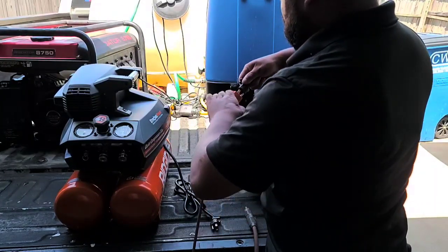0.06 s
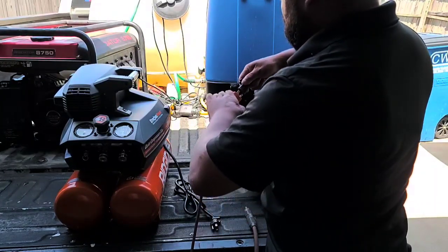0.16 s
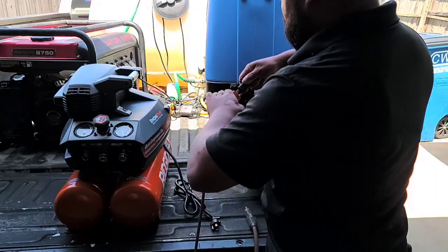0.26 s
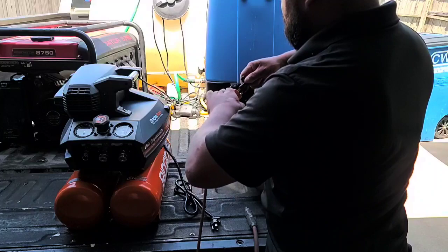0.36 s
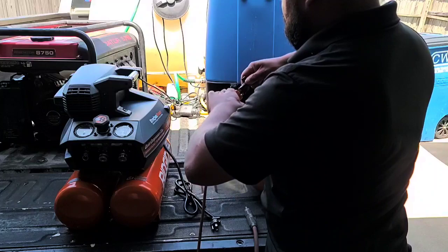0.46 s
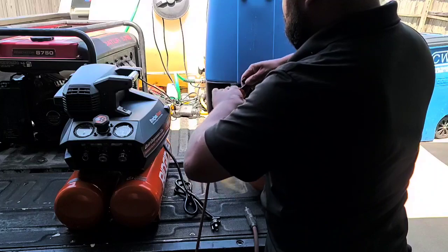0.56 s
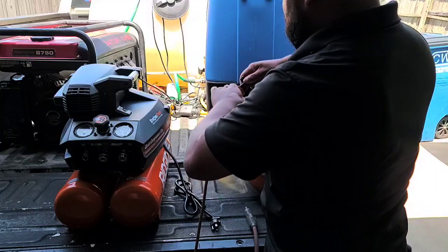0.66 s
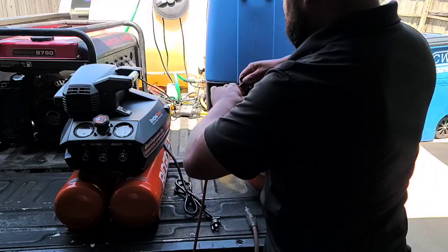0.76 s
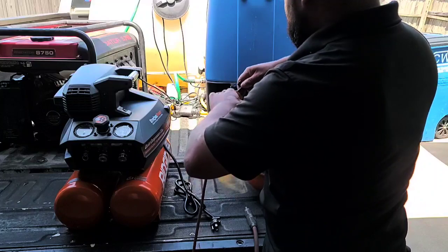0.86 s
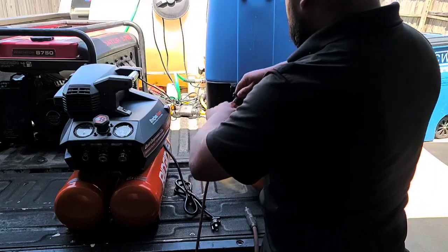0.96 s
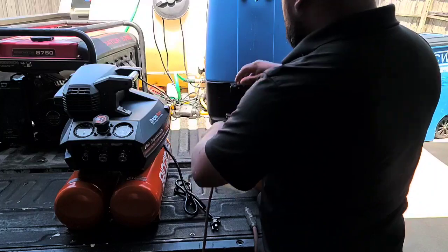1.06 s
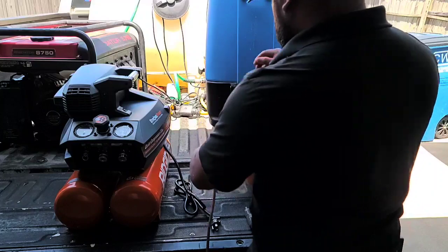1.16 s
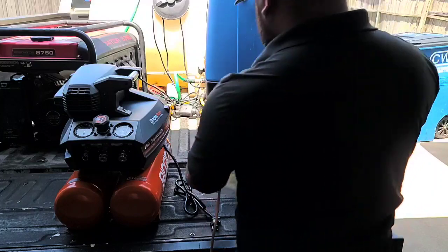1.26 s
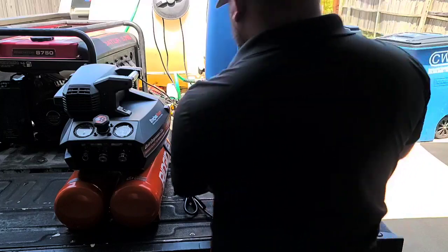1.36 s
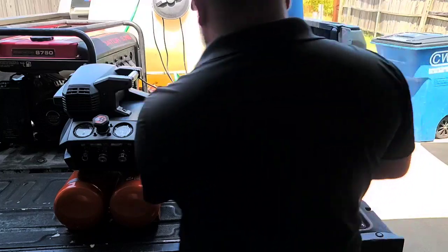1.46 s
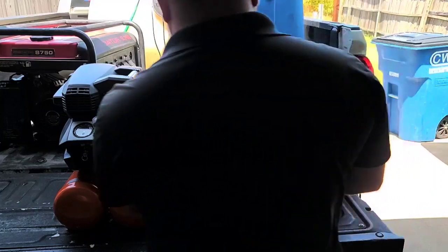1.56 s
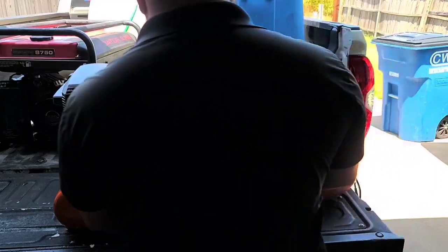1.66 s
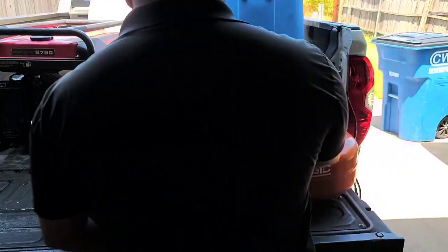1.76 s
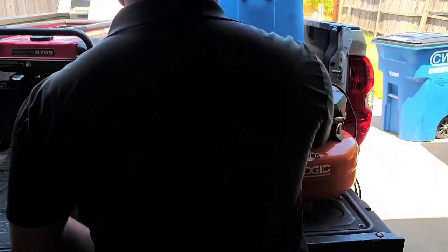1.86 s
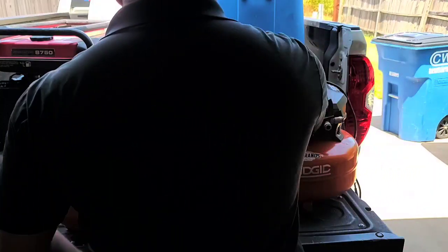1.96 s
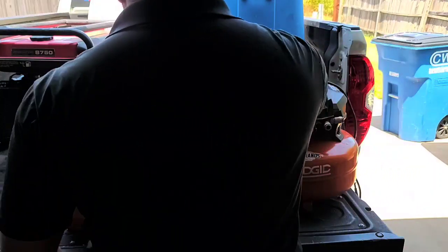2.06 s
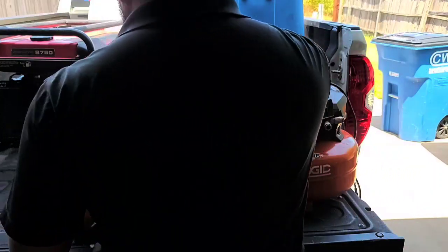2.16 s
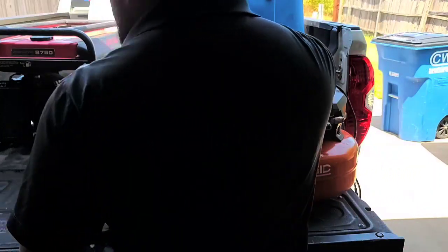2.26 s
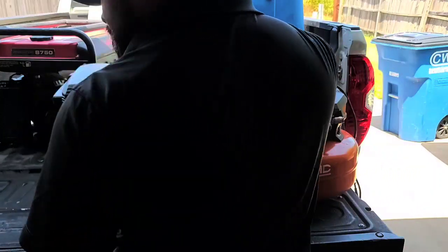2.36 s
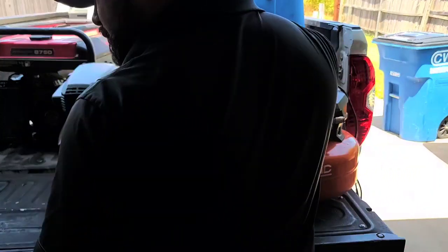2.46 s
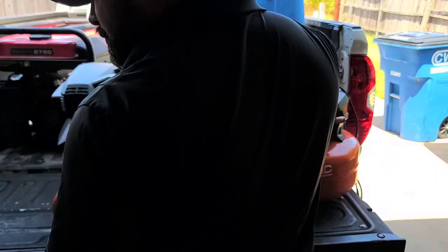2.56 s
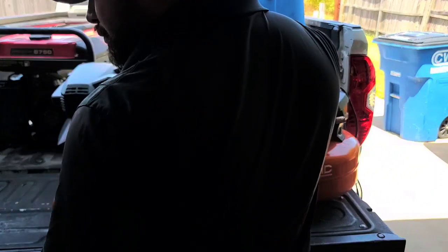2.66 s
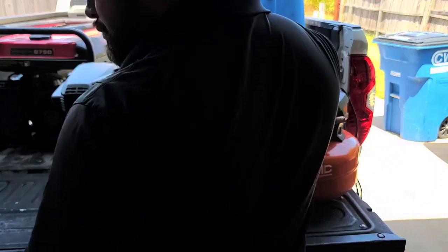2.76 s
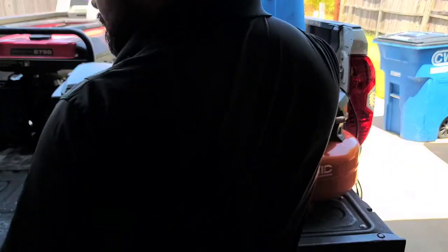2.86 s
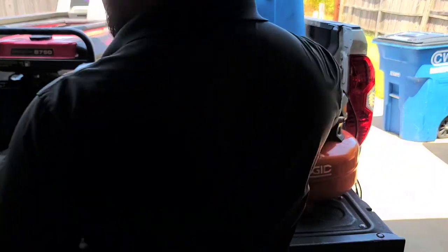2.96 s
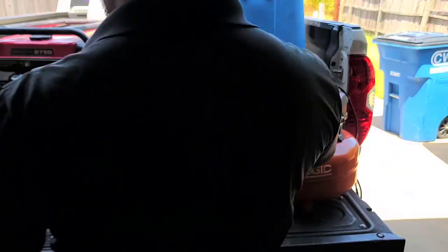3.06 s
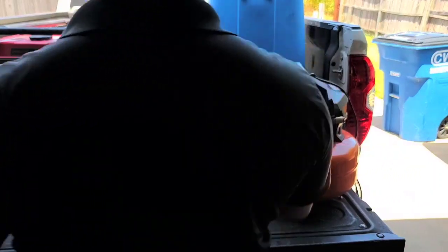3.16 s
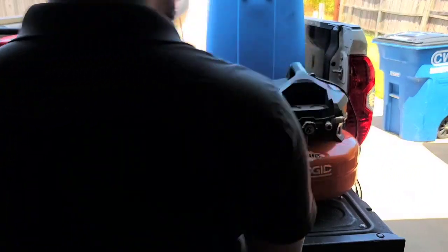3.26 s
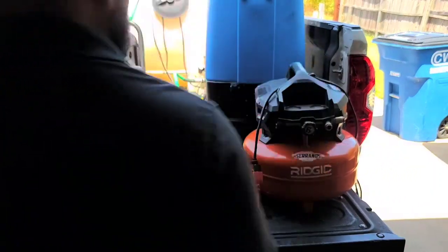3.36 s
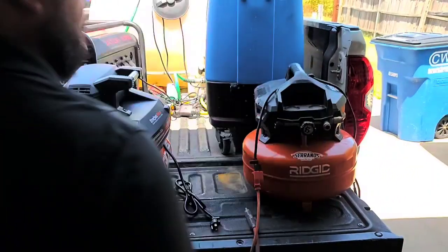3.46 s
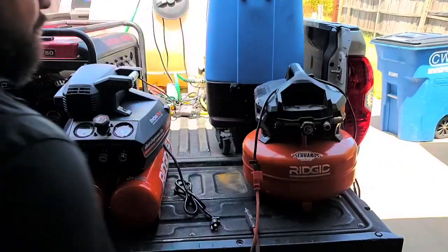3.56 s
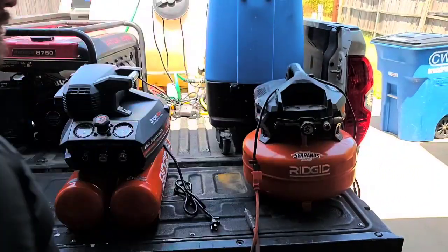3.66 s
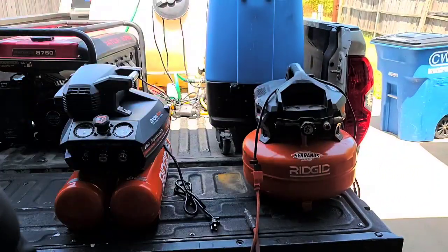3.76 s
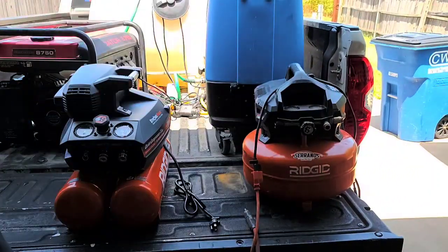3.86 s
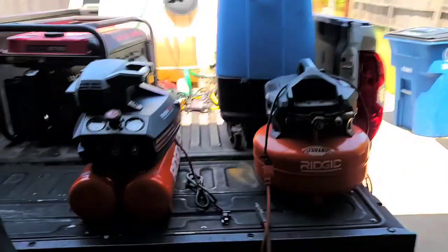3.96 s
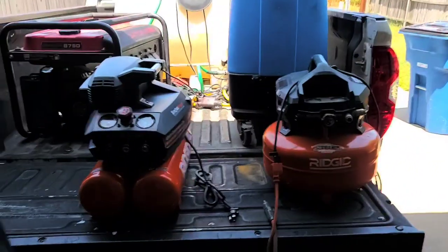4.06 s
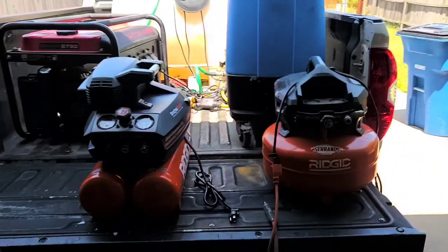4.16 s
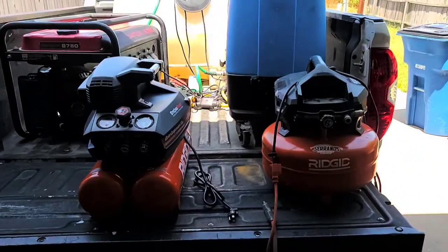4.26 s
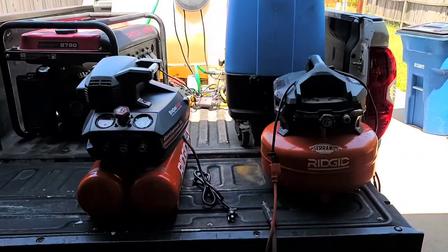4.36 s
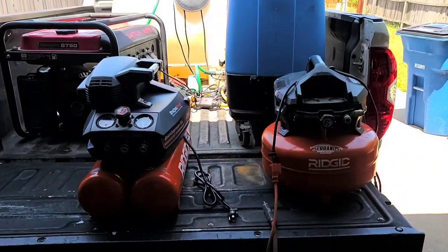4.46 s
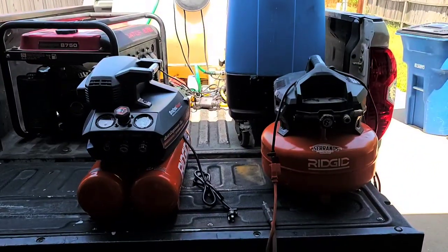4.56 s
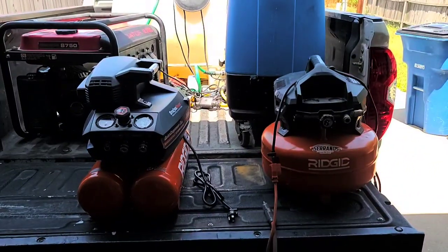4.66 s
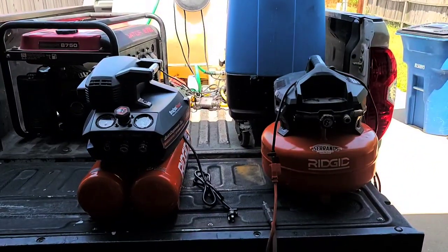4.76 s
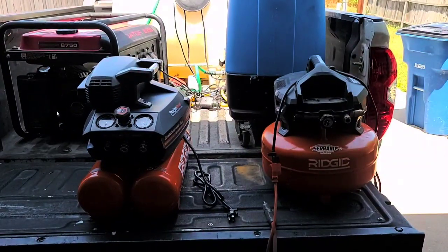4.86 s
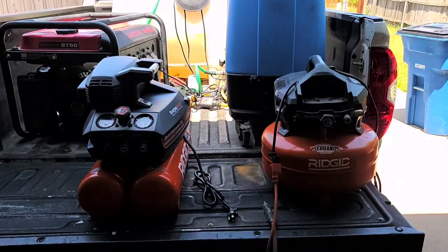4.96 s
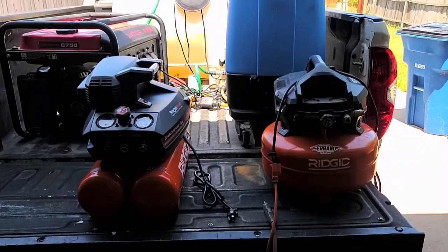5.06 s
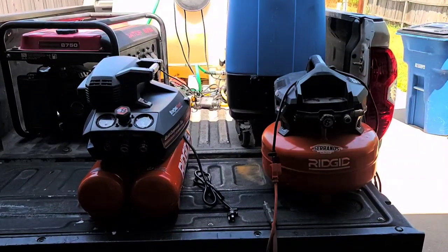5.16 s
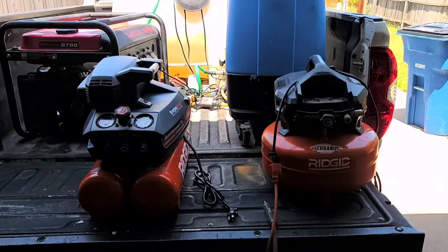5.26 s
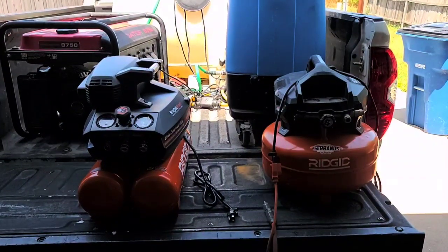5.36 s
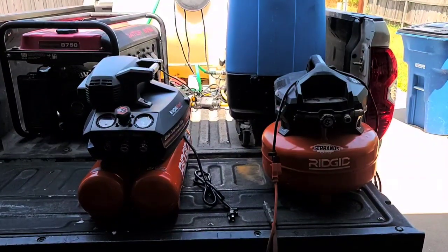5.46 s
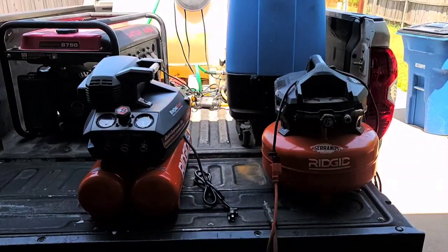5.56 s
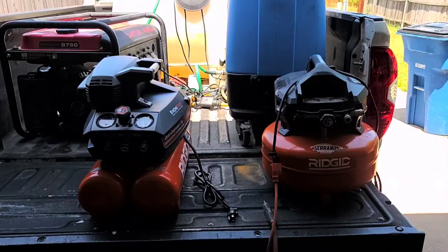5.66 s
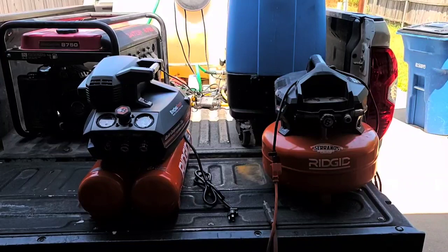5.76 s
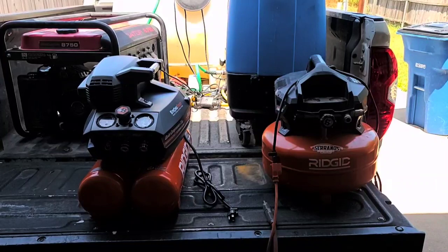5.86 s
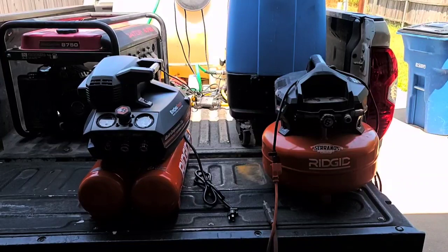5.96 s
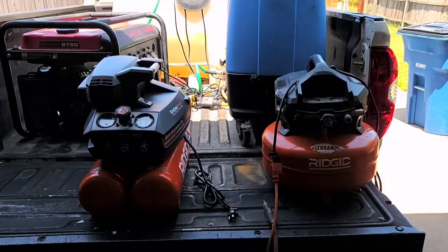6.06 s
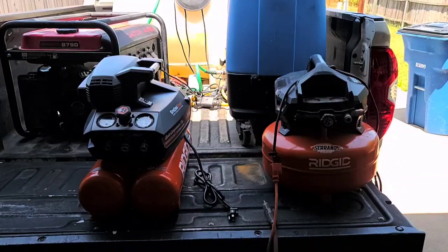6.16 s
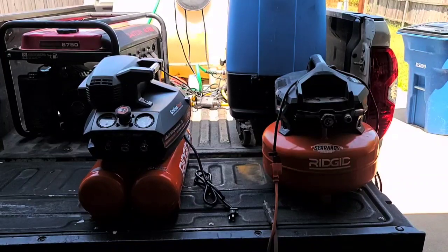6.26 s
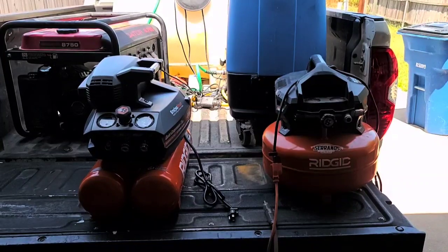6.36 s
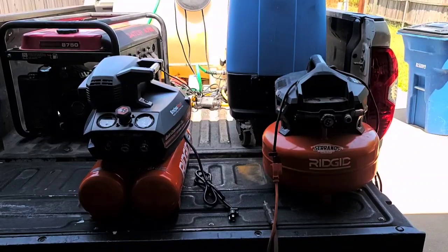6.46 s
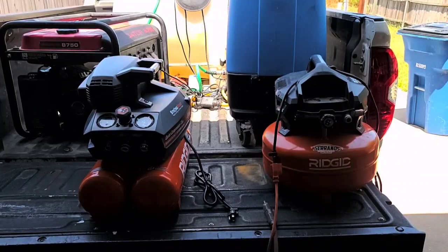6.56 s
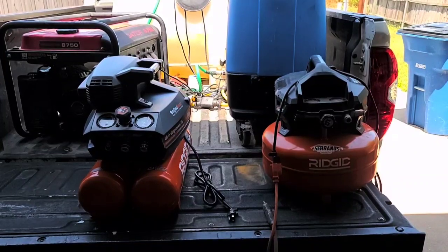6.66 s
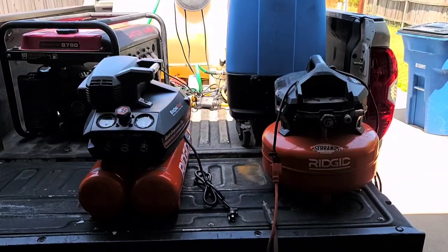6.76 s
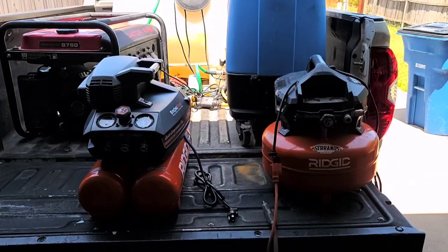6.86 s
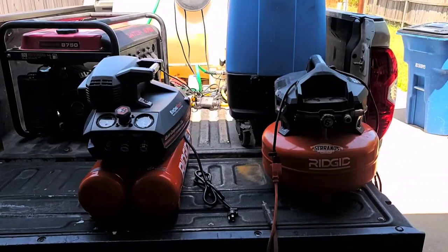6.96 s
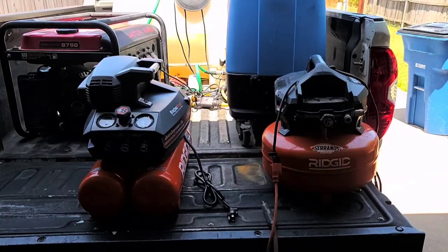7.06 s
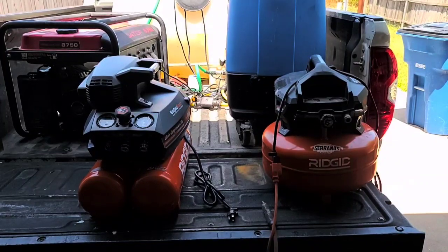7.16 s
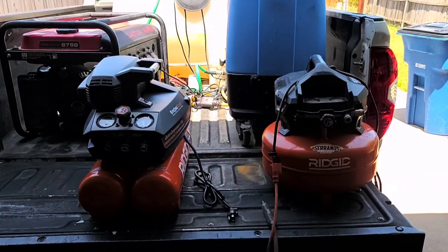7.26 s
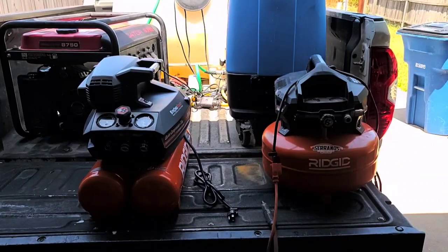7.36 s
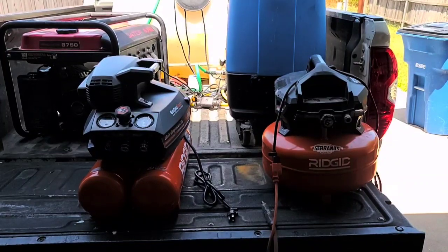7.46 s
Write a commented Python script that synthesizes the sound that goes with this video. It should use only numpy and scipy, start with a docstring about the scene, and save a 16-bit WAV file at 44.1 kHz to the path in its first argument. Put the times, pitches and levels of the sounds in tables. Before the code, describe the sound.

A hose coupler clicks, the hose drags and thuds onto a ribbed tailgate, then a piston compressor jolts into a loud, steady, clattering drone.

```python
"""A piston air compressor on a pickup's tailgate, outdoors, driven by a brush motor through a 4.5:1 reduction.
The motor growls at stall, spins up and runs loud, sagging slightly as the tank fills and its operator steps aside.
Piston and rotor are harmonics locked to the crank; air, gears and reeds are noise and pulses timed by its turns.
Before the start a hose coupler clicks and the hose is dragged and dropped on the bed: forces ring decaying modes.
Filtered noise makes the outdoor background, the shuffling and the scuffs."""
import sys
import numpy as np
from scipy import signal
from scipy.fft import rfft, irfft
from scipy.io import wavfile

SR = 44100
rng = np.random.default_rng(int(sys.argv[2]) if len(sys.argv) > 2 else 0)


def int16_out(signal):
    """Quantize to a 16-bit WAV file."""
    q = np.round(np.clip(np.atleast_2d(signal).T, -1, 1) * 32767)
    wavfile.write(sys.argv[1], SR, q.astype(np.int16))


N = 330750
TIME = np.arange(N) / SR
FREQS = np.maximum(np.arange(N // 2 + 1) * SR / N, 1)
SWITCH_S = 2.7585
GEAR = 4.5  # rotor turns per crank turn
RUN_RATE = 58.58  # crank turns per second, typical of the steady run


def from_db(db):
    """Decibel law: level to amplitude gain."""
    return 10 ** (np.asarray(db) / 20)


def rms_one(x):
    """Power normalisation: scale to unit rms."""
    return x / np.sqrt(np.mean(x ** 2) + 1e-20)


def in_time(rows):
    """Linear interpolation: each column of a curve, sample by sample."""
    s, *columns = np.transpose(rows)
    return [np.interp(TIME, s, column) for column in columns]


def colour(points, bumps=()):
    """Spectral envelope: a slope over log frequency, in dB, with resonances added on top."""
    hz, db = np.transpose(points)
    slope = np.interp(np.log(FREQS), np.log(hz), db)
    resonances = sum(height / (1 + (2 * (FREQS - f) / width) ** 2) for f, width, height in bumps)
    return from_db(slope + resonances)


def drift(rate_hz):
    """Random modulation: noise through a double pole at rate_hz, drawn every 100 samples, unit rms."""
    r = np.exp(-200 * np.pi * rate_hz / SR)
    noise = rng.standard_normal(N // 100 + 1002)
    slow = signal.lfilter([1], [1, -2 * r, r * r], noise)[1000:]  # drop the filter's onset
    return np.interp(np.arange(N) / 100, np.arange(len(slow)), rms_one(slow))


def split(x, gain, splits_hz):
    """Band analysis: colour a steady sound and part it into adjoining bands, each of unit rms."""
    rest, bands = rfft(x) * gain, []
    for hz in splits_hz:
        below = 1 / (1 + (FREQS / hz) ** 10)
        bands.append(rest * below)
        rest = rest * (1 - below)
    return [rms_one(irfft(band, N)) for band in bands + [rest]]


def ring(force, modes):
    """Modal superposition: a force drives decaying resonances in parallel, with alternating signs."""
    out = 0
    for k, (hz, t60, db) in enumerate(modes):
        r = np.exp(-np.log(1000) / (t60 * SR))
        w = 2 * np.pi * hz / SR
        mode = signal.lfilter([0, np.sin(w)], [1, -2 * r * np.cos(w), r * r], force + 1e-18)
        out = out + (-1) ** k * from_db(db) * mode
    return out


def low_pass(x, hz, order=2):
    """Butterworth low-pass: maximally flat below its cutoff."""
    return signal.sosfilt(signal.butter(order, min(hz, SR / 2 - 1), fs=SR, output="sos"), x)


def contact(chatter, decay_s, size=12000):
    """Impact force: one unit blow followed by exponentially dying chatter."""
    force = chatter * rng.standard_normal(size) * np.exp(-np.arange(size) / SR / decay_s)
    force[0] += 1
    return force


def add(out, s, x, peak_db):
    """Superposition: place a short sound at its time and peak level."""
    at = int(s * SR)
    out[at:at + len(x)] += from_db(peak_db) * x / np.abs(x).max()


def envelope(start_s, attack_s, hold_s, release_s):
    """Amplitude envelope: straight rise, hold, Gaussian fall."""
    since = TIME - start_s
    fall = np.maximum(since - attack_s - hold_s, 0) / release_s
    return np.clip(since / attack_s, 0, 1) * np.exp(-fall ** 2)


def swell(middle_s, length_s):
    """Raised-cosine window: one smooth hump of height 1."""
    return np.cos(np.pi * np.clip((TIME - middle_s) / length_s, -.5, .5)) ** 2


# Crossovers between the yard's rumble, rustle, air and hiss: f/Hz
YARD_SPLITS_HZ = [178, 430, 5330]
# Background spectrum before band levelling: f/Hz, relative density level/dB
YARD_COLOUR = [(15, -47), (25, -17), (43, -7), (64, -1.5), (91, -12.5), (123, -4.5), (148, -10.5),
               (341, -13), (554, -12), (725, -12), (830, -11), (900, -14.5), (4910, -30), (9380, -22),
               (15600, -36)]
# The operator shifts his weight: middle t/s, length t/s, rumble level/dB, rustle level/dB
SHUFFLES = [(0.05, 0.27, -38, -43), (0.67, .2, -28.5, -40.5), (.98, 0.17, -35, -42),
            (1.267, 0.98, -38, -40), (1.69, 0.27, -28.5, -38), (2.6, 0.18, -44, -39.5)]
# Faint electronic whistle: f/Hz, rms level/dB
WHISTLE = [(12888, -73), (13878, -64), (14869, -67)]
RUMBLE_DB, RUSTLE_DB, AIR_DB, HISS_DB = -39, -45, -45, -51.5  # resting levels
HISS_RISE_DB, HISS_RISE_FROM_S, HISS_RISE_TO_S = 5.5, .95, 2.05


def yard(gust_db, rustle_flicker_db):
    """Band-filtered noise: unsteady rumble, rustling feet and clothes, air and rising hiss, plus thin tones."""
    bumps = [(56, 16, 4.5), (4200, 4200, 8.5), (6850, 1800, -1.5), (9800, 1400, 4.0)]
    noise = rng.standard_normal(N)
    rumble, rustle, air, hiss = split(noise, colour(YARD_COLOUR, bumps), YARD_SPLITS_HZ)
    rumble_gain = from_db(RUMBLE_DB + gust_db * drift(7.1))
    rustle_gain = from_db(RUSTLE_DB + rustle_flicker_db * drift(6.2))
    # independent noises add in power
    for s, length, rumble_db, rustle_db in SHUFFLES:
        hump = swell(s, length)
        rumble_gain = np.hypot(rumble_gain, from_db(rumble_db) * hump)
        rustle_gain = np.hypot(rustle_gain, from_db(rustle_db) * hump)
    air_gain = np.hypot(from_db(AIR_DB), 0.55 * rustle_gain)
    hiss_rise_db = np.interp(TIME, [HISS_RISE_FROM_S, HISS_RISE_TO_S], [0, HISS_RISE_DB])
    hiss_gain = from_db(HISS_DB + hiss_rise_db)
    whistle = sum(from_db(db) * np.sin(2 * np.pi * hz * TIME + .8 * drift(25)) for hz, db in WHISTLE)
    noises = rumble * rumble_gain + rustle * rustle_gain + air * air_gain + hiss * hiss_gain
    return noises + np.sqrt(2) * whistle


# Sharp clicks of coupler, switch and sparking brushes: t/s, peak level/dB
CLICKS = [(0.6183, -14.5), (.6225, -33), (.6268, -21), (.692, -33), (2.759, -2.5), (2.762, -24),
          (2.832, -6), (2.868, -0.5), (2.922, -5)]
# Modes of the small metal parts: f/Hz, t60/s, relative level/dB
CLICK_MODES = [(2520, 0.0042, -1.5), (3540, 0.0025, 3.5), (4430, 0.0033, -4), (5270, 0.0057, -2),
               (5560, 0.0019, -5), (8800, 0.0022, 0), (9120, 0.0021, 2.5)]


def clicks():
    """Impact excitation: a brief contact force rings small metal parts and is heard directly too."""
    out = np.zeros(N)
    for s, db in CLICKS:
        force = contact(chatter=0.21, decay_s=0.0043)
        click = ring(force, CLICK_MODES) + 1.8 * force
        add(out, s, low_pass(click, 10700, order=4), db)
    return out


# Knocks on the truck bed: t/s, peak level/dB, hardness as low-pass cutoff f/Hz, bass-mode level/dB
KNOCKS = [(.931, -23, 1100, 1), (1.1572, -18, 2480, -7), (1.163, -18, 1500, -2), (1.2106, -12, 1500, -6),
          (1.2465, -18, 1800, -26), (1.267, -22, 1200, -21), (1.3811, -6, 1980, -7), (1.3863, -5.5, 450, 3),
          (1.616, -21.5, 2220, -18), (1.685, -34, 220, 2)]
# Modes of the bed before the bass adjustment: f/Hz, t60/s, relative level/dB
BED_MODES = [(200, 0.067, -9.5), (252, 0.045, 1), (306, 0.06, 0.5), (472, 0.081, -3.5), (590, 0.062, -6),
             (690, 0.037, 2.5), (794, 0.045, -2.5), (1100, 0.019, -8), (1420, 0.018, -7), (1970, 0.02, -7),
             (2770, .02, -8), (3630, .018, -6)]


def knocks():
    """Contact stiffness: blows ring the bed's modes, and a harder contact has a higher cutoff."""
    out = np.zeros(N)
    for s, db, hard_hz, bass_db in KNOCKS:
        modes = [(hz, t60, level + bass_db / (1 + (hz / 450) ** 4)) for hz, t60, level in BED_MODES]
        crack = 0.93 * contact(chatter=1.0, decay_s=0.0054)
        thud = ring(contact(chatter=0.029, decay_s=0.018), modes)
        add(out, s, low_pass(thud + crack, hard_hz), db)
    return out


# Scuffs of shoes and cloth: middle t/s, length t/s, peak level/dB, band f/Hz
SCUFFS = [(1.034, 0.082, -28, 480), (1.15, 0.036, -31, 2900), (1.675, .06, -31, 2900),
          (2.026, 0.039, -31, 1600), (2.284, 0.032, -37, 1500), (2.482, 0.065, -30, 1600),
          (2.597, 0.047, -28.5, 2400)]


def scuffs():
    """Band-limited friction noise: short soft swishes as the operator shifts about."""
    out = np.zeros(N)
    for s, length, db, hz in SCUFFS:
        grains = rng.standard_normal(SR // 4)[:int(length * SR)]
        band = signal.butter(1, [hz / 1.6, hz * 1.17], "band", fs=SR, output="sos")
        swish = signal.sosfilt(band, grains * np.hanning(len(grains)))
        add(out, s - length / 2, swish, db)
    return out


# Pulls of the hose over the ribbed bed: start t/s, hold t/s, level/dB
PULLS = [(1.142, .02, -37), (1.256, 0.083, -31.5)]
PULL_ATTACK_S, PULL_RELEASE_S = 0.024, .025


def hose():
    """Sliding friction: irregular slips make coloured noise while the hose is pulled over the bed."""
    slips = rng.standard_normal(N) * from_db(1.6 * drift(60))
    slide_colour = colour([(100, -22), (400, -7), (780, 0), (1050, -4.5), (1500, -4), (2200, -13),
                           (4000, -22), (8000, -38)])
    slide = irfft(rfft(slips) * slide_colour, N)
    pulling = sum(from_db(db) * envelope(s, PULL_ATTACK_S, hold, PULL_RELEASE_S) for s, hold, db in PULLS)
    return pulling * rms_one(slide)


# crank turns per second with an empty tank, and loss per second as it fills
FREE_RATE, SAG_PER_S = 59.84, .2847
# share of speed won by the first kick, its time constant, and that of the slower climb
KICK_SHARE, KICK_S, CLIMB_S = .513, .0739, .2576


def crank():
    """Exponential run-up: share of free speed, and turns per second sagging against the rising pressure."""
    since = np.maximum(TIME - SWITCH_S, 0)
    kick_left = KICK_SHARE * np.exp(-since / KICK_S)
    climb_left = (1 - KICK_SHARE) * np.exp(-since / CLIMB_S)
    spin = np.maximum(1 - kick_left - climb_left, 0)
    return spin, spin * (FREE_RATE - SAG_PER_S * since)


# What the stalled motor shakes: f/Hz, t60/s, relative level/dB
STALL_MODES = [(121.4, 0.17, -9), (328, 0.076, -4), (700, 0.072, -5), (836, 0.068, -7.5),
               (1190, 0.029, 4.5), (1360, 0.046, 0), (1764, 0.043, 4), (4380, .03, -9.5), (5200, .03, -11)]
STALL_DB, STALL_ATTACK_S, STALL_HOLD_S, STALL_RELEASE_S = -10.8, .028, .035, .075


def stall(rough, buzz):
    """Electromagnetic forcing: inrush current jolts the frame 120 times a second, twice a mains cycle."""
    beat = TIME * 120 % 1
    pulses = (np.diff(beat, prepend=0) < 0) * (1 + rough * rng.standard_normal(N))
    force = pulses + buzz * rng.standard_normal(N) * np.exp(-3 * beat)
    gain = from_db(STALL_DB) * envelope(SWITCH_S, STALL_ATTACK_S, STALL_HOLD_S, STALL_RELEASE_S)
    return gain * rms_one(ring(force, STALL_MODES))


# Piston harmonics, nominal: multiple of crank speed, rms level/dB at first, rms level/dB once settled
PUMP = [(1, -30.1, -29.7), (2, -38.9, -42.6), (3, -25.3, -27.2), (4, -23.0, -23.0), (5, -19.4, -18.7),
        (5.5, -36.0, -32.1), (6, -35.0, -28.7), (7, -30.7, -28.1), (7.5, -33.4, -32.9), (8, -29.7, -27.9),
        (9, -35.8, -32.1), (10, -33.6, -32.3), (11, -23.3, -30.9), (12, -26.8, -25.0), (13, -28.6, -24.4),
        (13.5, -40.5, -40.3), (14.5, -33.5, -44), (15, -32.6, -41.9), (16, -26.2, -30.1),
        (17, -22.3, -34.4), (18, -34.5, -24.5), (19, -43, -28.9), (20, -33.5, -43), (21, -34.2, -34.9),
        (22, -34.2, -31.2), (26, -30.8, -34.2), (27, -27.7, -33.4), (28, -31.8, -31.0), (32, -38.3, -33.0),
        (33, -35, -30.5), (34, -33.0, -34.2), (35, -29.5, -27.5), (36, -38.5, -29.8), (39, -44, -36)]
FRAME_HZ, FRAME_WIDTH_HZ = 324, 63  # frame resonance


def piston(turns, speed, settling, dispersion, waver_db, flutter_db, level_db, boom_db, growth, body_share):
    """Fourier synthesis: stroke harmonics coloured by the body response they sweep through in spin-up."""
    orders, first, settled = np.transpose(PUMP)
    strain = np.clip(4 * (1 - speed), 0, 1)  # starting torque makes the frame boom
    out = 0
    for k, first_db, settled_db in PUMP:
        # mean level of the harmonic now at this pitch, against the mean level of this one
        body_db = np.interp(k * speed, orders, (first + settled) - (first_db + settled_db)) / 2
        db = (1 - settling) * first_db + settling * settled_db + body_share * body_db
        off_tune = 2 * (k * speed * RUN_RATE - FRAME_HZ) / FRAME_WIDTH_HZ
        boom = boom_db * strain / (1 + off_tune ** 2)
        loose = np.sqrt(k / orders[-1])  # high harmonics vary most
        db = db + boom + loose * (waver_db * drift(.8) + flutter_db * drift(10))
        out = out + from_db(db) * np.sin(2 * np.pi * (k * turns - dispersion * k ** 2))
    return np.sqrt(2) * from_db(level_db) * speed ** growth * out


# Whine of fan blades and commutator bars: multiple of motor speed, relative level/dB at first, once settled
WHINE = [(12, 1, 5), (22, -9, -4), (24, 1, 9), (44, -10, -7), (48, 0, -1)]
# nominal level, change once settled, and the power of spin with which each grows
HUM_DB, HUM_SETTLED_DB, HUM_GROWTH = -19.5, 2.0, 16
WHINE_DB, WHINE_SETTLED_DB, WHINE_GROWTH = -40, -4, 1.5
WHINE_SWELL_S, WHINE_SWELL_LENGTH_S, WHINE_SWELL_DB = 4.68, .6, 6.5  # one swell: middle, length, height
HUM_LAG_TURNS = .02  # the rotor's unbalance trails the piston, in rotor turns


def motor(turns, spin, settling, dispersion, twist, wander, flutter, waver_db, brush_noise):
    """Rotating unbalance hums; blade and bar passing whines, phase-modulated by strokes, roughened by brushes."""
    hum_gain = from_db(HUM_DB + HUM_SETTLED_DB * settling) * spin ** HUM_GROWTH
    whine_swell_db = WHINE_SWELL_DB * swell(WHINE_SWELL_S, WHINE_SWELL_LENGTH_S)
    whine_db = WHINE_DB + WHINE_SETTLED_DB * settling + whine_swell_db
    rotor = GEAR * turns + twist * np.sin(2 * np.pi * turns)
    rotor = rotor + wander * drift(4.5) + flutter * drift(45)
    whine = 0
    for k, first_db, settled_db in WHINE:
        db = first_db + settling * (settled_db - first_db) + waver_db * drift(2.5)
        whine = whine + from_db(db) * np.sin(2 * np.pi * k * rotor)
    whine = whine * (1 + brush_noise * drift(90))
    hum = np.sin(2 * np.pi * (rotor - dispersion * GEAR ** 2 - HUM_LAG_TURNS))
    return np.sqrt(2) * (hum_gain * hum + from_db(whine_db) * spin ** WHINE_GROWTH * whine)


# Crossovers of the cooling-air rush: f/Hz
RUSH_SPLITS_HZ = [900, 2500, 4500, 10000]
# Rush spectrum before band levelling: f/Hz, relative density level/dB
RUSH_COLOUR = [(25, -34), (60, -17.5), (170, -8.5), (240, 1), (550, -2.5), (1000, 1.5), (1450, 0),
               (3500, 0), (4500, -7), (7000, -13.5), (10000, -14.5), (11500, -25), (13500, -28),
               (15700, -44)]
# Shroud and tank resonances: f/Hz, width f/Hz, height level/dB
SHROUD = [(320, 60, 4), (450, 60, 5), (730, 110, 7), (1060, 90, 4), (1290, 90, 2), (1600, 130, 5),
          (2070, 140, 7), (2600, 200, 2), (3150, 400, 2.5), (7400, 400, 3), (8100, 400, 2)]
# Bands from low to top, nominal: level/dB, change of level/dB while labouring, change once settled
RUSH_BANDS = [(-21, 0.2, -0.5), (-20.5, 1, 1.04), (-20, -2.5, -1.5), (-26.5, 2, 2.5), (-32.5, -1.5, -5)]


def rush(turns, labour, settling, mesh_share, throb_db, labour_throb_db, grit_db, size=200):
    """Amplitude-modulated air noise throbs with the crank; periodic gear errors repeat every two turns."""
    tooth_orders = np.arange(size // 2 + 1) / 2
    random_phases = np.exp(2j * np.pi * rng.random(len(tooth_orders)))
    errors = random_phases * np.clip(tooth_orders / 22, 0, 1) ** 2
    teeth = irfft(errors, size * 10)
    chatter = np.interp(turns / 2 % 1, np.linspace(0, 1, len(teeth)), teeth)
    mesh = rms_one(low_pass(chatter, 2230))
    air = rng.standard_normal(N) * from_db(grit_db * drift(220))
    bands = split(rms_one(air) + mesh_share * mesh, colour(RUSH_COLOUR, SHROUD), RUSH_SPLITS_HZ)
    # a swell every turn and a stronger one every second turn
    throb = 0.29 * np.cos(2 * np.pi * turns) + 1.2 * np.cos(np.pi * turns)
    stroke = from_db(throb_db * throb + 0.56 * drift(7.3))
    levelled = []
    for band, (db, labour_db, settled_db) in zip(bands, RUSH_BANDS):
        levelled.append(band * from_db(db + labour_db * labour + settled_db * settling))
    low, middle, *treble = levelled
    # twice a turn while the motor labours
    pumping = from_db(labour_throb_db * np.sqrt(labour) * np.sin(4 * np.pi * turns + np.pi / 4))
    return stroke * ((low + middle) * pumping + sum(treble))


# Valve plate struck by its reeds: f/Hz, t60/s, relative level/dB
VALVE_MODES = [(1327, 0.03, 7), (1614, 0.067, -3), (2020, 0.008, -22), (2440, 0.024, 13.5),
               (3010, 0.023, 5)]


def valves(turns, speed, labour, level_db, labour_db, uneven_db, bounce_turns):
    """Periodic impacts: two reeds slap once a turn each, flutter and ring the plate, harder under labour."""
    force = 0
    for lag, strength in ((0, 0.39), (.38, 1)):  # lag in turns
        since = (turns - lag) % 1
        slap = (np.diff(since, prepend=0) < -.5) * from_db(uneven_db * drift(42))
        bounce = 0.067 * rng.standard_normal(N) * np.exp(-since / bounce_turns)
        force = force + strength * (slap + bounce)
    plate = rms_one(ring(force * (TIME > SWITCH_S), VALVE_MODES))
    return from_db(level_db + labour_db * labour) * speed ** 2 * plate


# Modes of the chattering shroud: f/Hz, t60/s, relative level/dB
RATTLE_MODES = [(870, 0.016, -10), (1027, 0.033, -2), (1270, .018, 1.5), (1720, 0.018, 0)]
RATTLE_S, RATTLE_LENGTH_S = 3.13, 0.98  # middle and length


def rattle(turns, level_db, decay_turns):
    """Repeated loose contact: the shroud chatters twice a turn in one swell during the spin-up."""
    chatter = rng.standard_normal(N) * np.exp(-(turns % .5) / decay_turns)
    return from_db(level_db) * swell(RATTLE_S, RATTLE_LENGTH_S) * rms_one(ring(chatter, RATTLE_MODES))


# The frame jolts as the switch closes and at the first compression: t/s, peak level/dB
JOLTS = [(2.765, -9.5), (2.862, -9)]
# What the jolted frame rings with: f/Hz, t60/s, relative level/dB
JOLT_MODES = [(125, .2, -8), (300, .15, -7), (335, .24, 0)]


def jolts():
    """Transient excitation: sudden torque sets the frame's low modes booming."""
    out = np.zeros(N)
    for s, db in JOLTS:
        add(out, s, ring(contact(chatter=0.052, decay_s=.04), JOLT_MODES), db)
    return out


# Ring of the brushes under the starting current: f/Hz, t60/s, relative level/dB
RASP_MODES = [(3820, 0.021, -3.5), (4450, 0.0086, 0), (4870, 0.01, -1.5), (5400, 0.0074, -4),
              (9100, 0.0021, 2)]
RASP_DB, RASP_S, RASP_ATTACK_S, RASP_HOLD_S, RASP_RELEASE_S = -20, 2.822, 0.0095, 0.11, 0.28


def brushes(turns):
    """Modulated noise excitation: sparking brushes rasp in spurts once a rotor turn, then fade."""
    sparks = rng.standard_normal(N) * from_db(1.6 * np.cos(2 * np.pi * GEAR * turns))
    gain = from_db(RASP_DB) * envelope(RASP_S, RASP_ATTACK_S, RASP_HOLD_S, RASP_RELEASE_S)
    return gain * rms_one(ring(sparks, RASP_MODES))


# The timbre shifts as the tank fills and the operator steps aside: t/s,
# weight of the settled timbre [1; values outside 0 to 1 extrapolate]
SETTLING = [(3.4, 0.4), (3.75, -0.22), (4.4, -0.045), (4.8, 0.15), (5.25, 0.66), (7.4, 1.24)]
LABOUR_SLIP = 0.04  # the motor labours until within about this share of free speed


def compressor():
    """Phase locking: the crank's turns time the rotating parts, silent until the switch closes."""
    spin, rate = crank()
    settling, = in_time(SETTLING)
    labour = np.tanh((1 - spin) / LABOUR_SLIP)
    turns = np.cumsum(rate) / SR + 0.0012 * drift(14.0)
    speed = rate / RUN_RATE
    dispersion = .55  # the housing delays high harmonics more than low ones
    tones = piston(turns, np.minimum(speed, 1), settling, dispersion, waver_db=1.5, flutter_db=1.0,
                   level_db=0.0, boom_db=18.5, growth=2.7, body_share=0.088)
    tones = tones + motor(turns, spin, settling, dispersion, twist=0.0021, wander=0.0018, flutter=0.0013,
                          waver_db=2.5, brush_noise=0.39)
    air = rush(turns, labour, settling, mesh_share=0.18, throb_db=0.8, labour_throb_db=1.0, grit_db=1.0)
    air = air + valves(turns, speed, labour, level_db=-27.5, labour_db=3.0, uneven_db=3.0, bounce_turns=0.071)
    air = air + rattle(turns, level_db=-13.5, decay_turns=0.17)
    spun_up = np.clip(0.5 + 0.53 * speed, 0, 1)
    start = stall(rough=0.46, buzz=0.19) + jolts() + brushes(turns)
    switched_on = np.clip((TIME - SWITCH_S) / 0.0019, 0, 1)
    return switched_on * (tones + air * spun_up + start)


def scene():
    """Linear superposition: all sources sum to one signal, the same in both channels."""
    background = yard(gust_db=2.5, rustle_flicker_db=1.5)
    mono = background + clicks() + knocks() + scuffs() + hose() + compressor()
    return np.array([mono, mono])


CUTOFF_HZ = 15750


def record(dry):
    """Soft saturation rounds the highest peaks; an elliptic low-pass cuts the top."""
    held = dry / (1 + (dry / .97) ** 6) ** (1 / 6)
    return signal.sosfilt(signal.ellip(12, .1, 80, CUTOFF_HZ, fs=SR, output="sos"), held)


dry = scene()
out = record(dry)
int16_out(out)
```